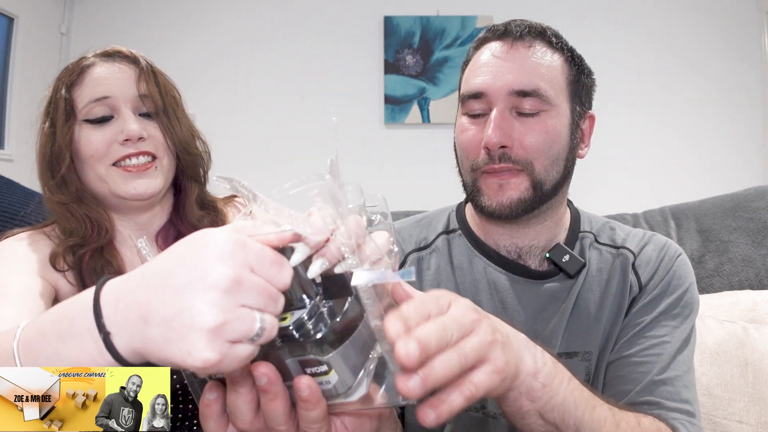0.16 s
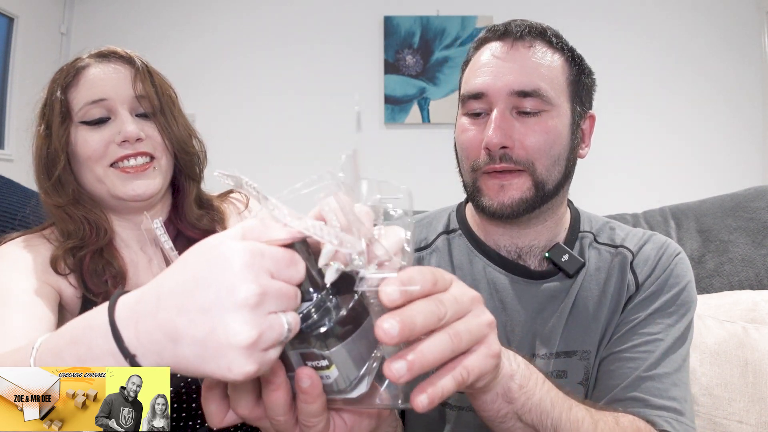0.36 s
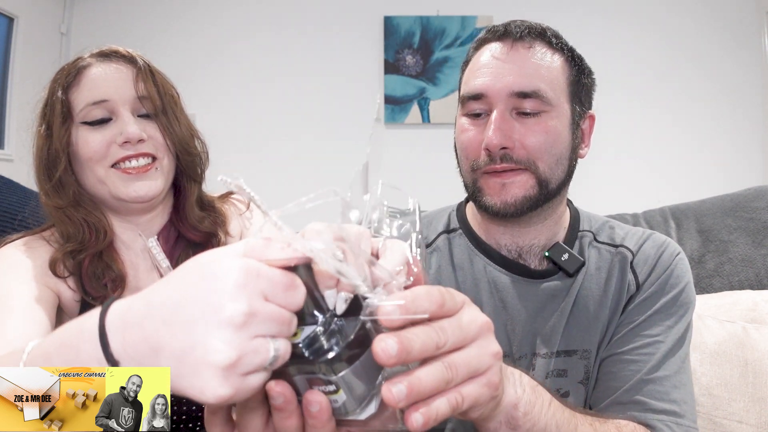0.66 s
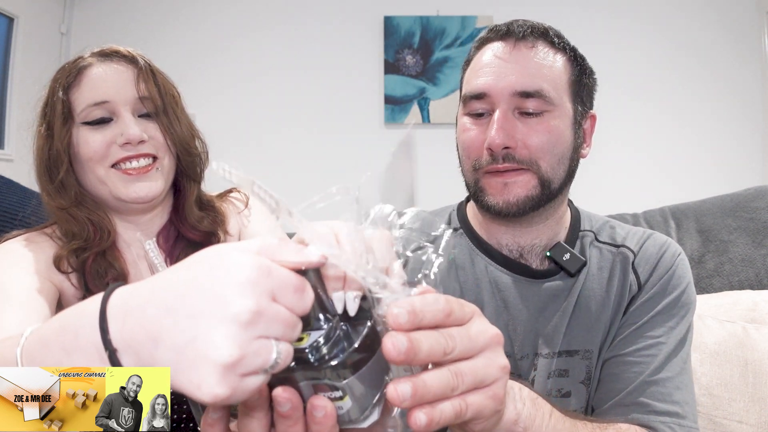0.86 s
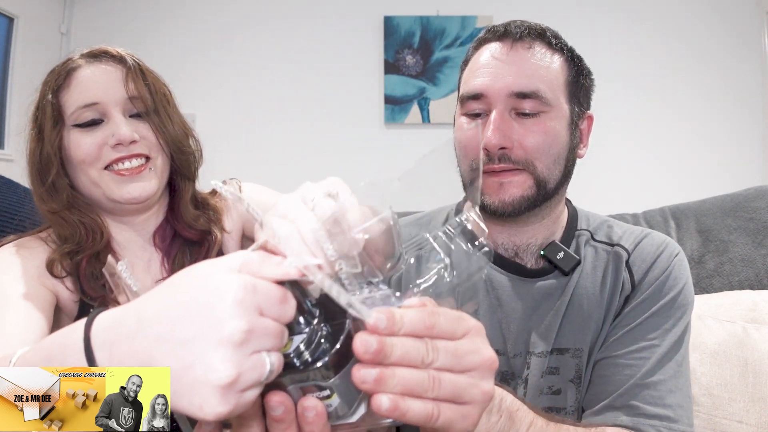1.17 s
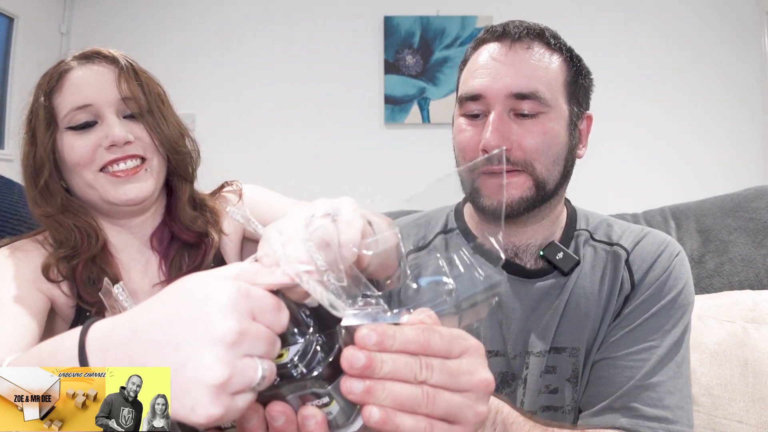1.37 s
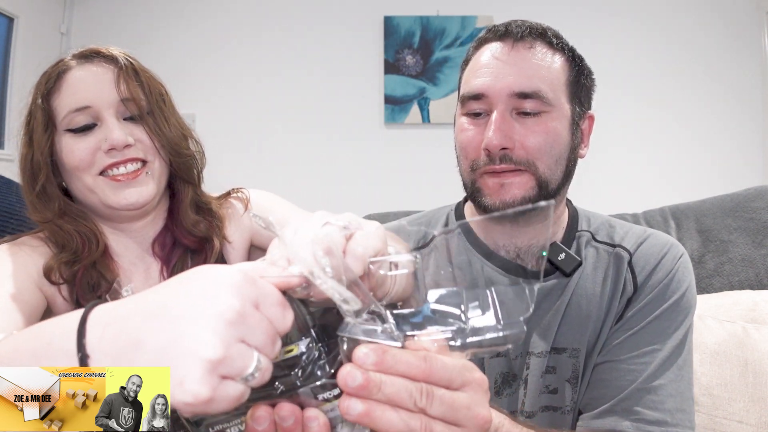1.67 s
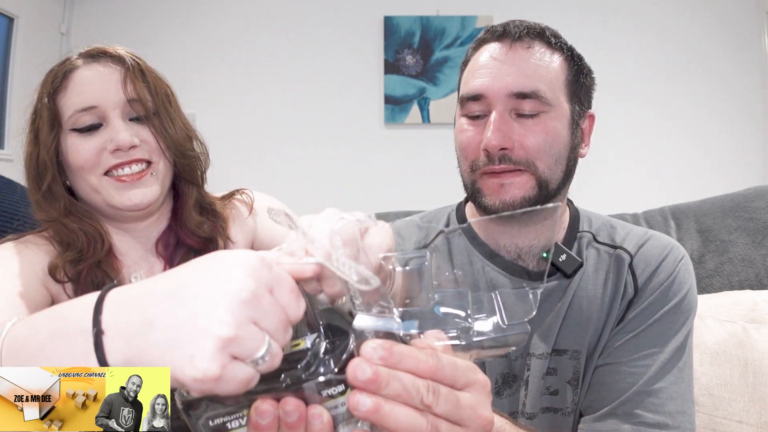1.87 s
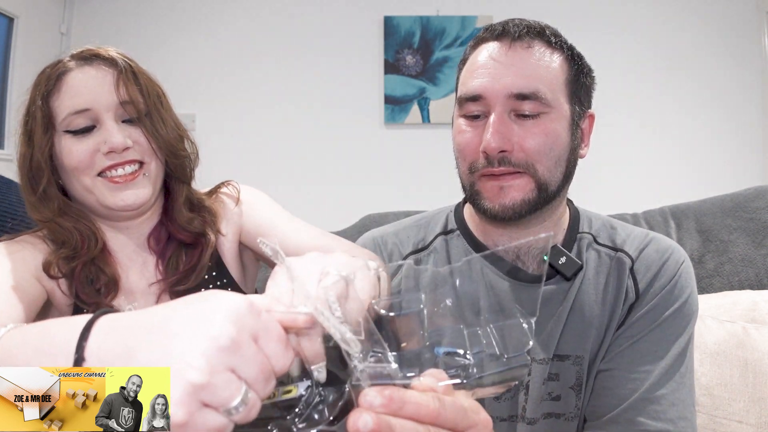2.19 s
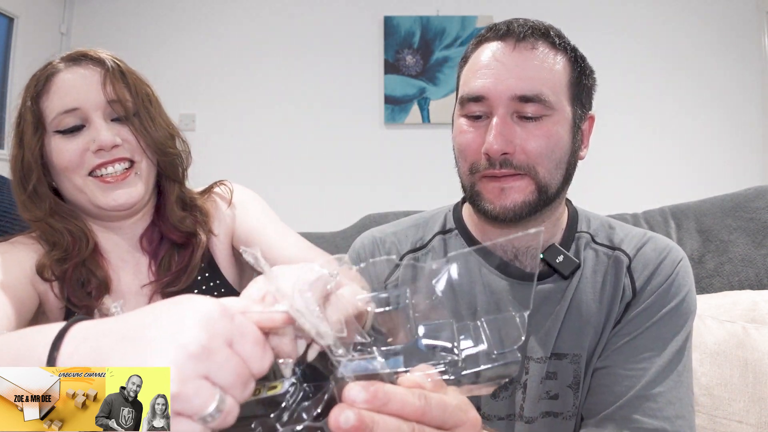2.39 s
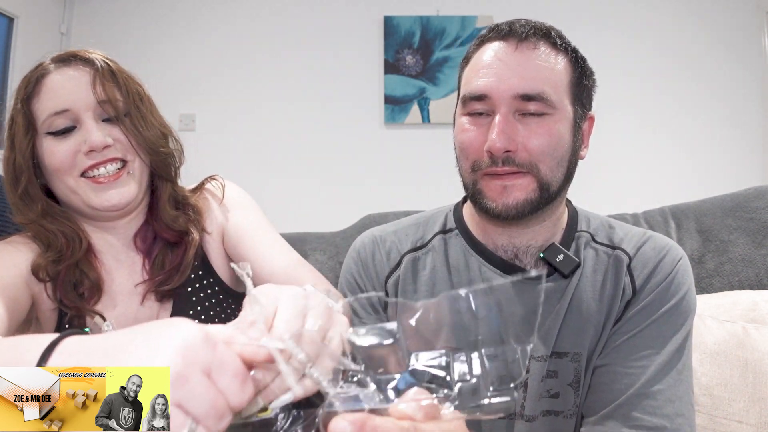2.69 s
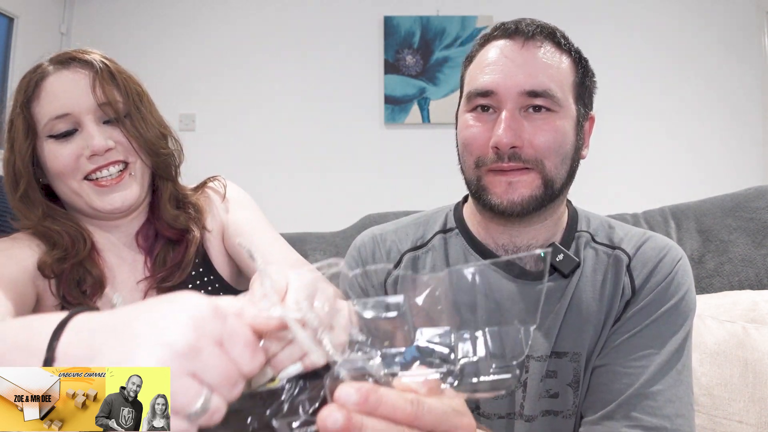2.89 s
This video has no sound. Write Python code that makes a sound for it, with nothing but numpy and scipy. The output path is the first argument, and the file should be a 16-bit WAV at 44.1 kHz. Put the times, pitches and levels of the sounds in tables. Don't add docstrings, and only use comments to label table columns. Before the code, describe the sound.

Plastic blister pack crinkling, popping and crunching close up in a quiet, soft living room

```python
import sys
import numpy as np
from scipy import signal
from scipy.fft import rfft, irfft, next_fast_len
from scipy.io import wavfile
from scipy.ndimage import map_coordinates

SR = 44100
rng = np.random.default_rng(int(sys.argv[2]) if len(sys.argv) > 2 else 0)


def boost(x):
    u = np.asarray(x, float) / 20
    return 10 ** u


def waveform_to_disk(signal):
    frames = np.transpose(np.atleast_2d(signal))
    scaled = np.clip(frames, -1, 1) * 32767
    samples = np.round(scaled).astype(np.int16)
    wavfile.write(sys.argv[1], SR, samples)


N = 134505

# frequency_hz, density_db
HUSH_SPECTRUM = [(18, -64), (30, -50.5), (103, -10.5), (394, -2), (1590, -8), (5590, -27), (16000, -46)]
# start_s, peak_db
TICKS = [(0.0024, -33.5), (0.0444, -31), (0.1315, -27.5), (0.2, -25.5), (0.276, -43.5), (.349, -43.5),
         (0.379, -44), (0.418, -36), (0.489, -36.5), (.522, -44), (.596, -36), (0.835, -29),
         (0.4568, -27.5), (0.5143, -31.5), (0.538, -30.5), (0.7402, -32.5), (0.7662, -31.5),
         (0.822, -42.5), (0.853, -29), (0.8775, -27), (0.9096, -19.5), (1.0906, -29), (1.408, -34),
         (1.447, -33.5), (1.491, -34.5), (1.513, -19.5), (1.5255, -25.5), (1.575, -18.5),
         (1.648, -26), (1.6672, -21.5), (1.7201, -16.5), (1.747, -15.5), (1.7774, -24.5),
              (1.8055, -20), (1.86, -43.5), (1.9111, -34.5), (1.931, -48.5), (2.0101, -21.5), (2.154, -38),
              (2.192, -36), (2.2048, -27), (2.268, -42), (2.2852, -28), (2.3329, -10.5), (2.4097, -25),
              (2.444, -36.5), (2.672, -25), (2.7335, -27), (2.7741, -24), (2.902, -38.5), (2.98, -56),
              (2.996, -44.5), (3.008, -49.5), (3.026, -55.5), (3.045, -47.5)]
# start_s, end_s, slip_rate_hz, peak_db
CREAKS = [
    (1.935, 2.014, 169.6, -37),
    (2.215, 2.328, 172, -39),
    (2.839, 2.96, 81, -51.5),
]
# start_s, peak_db, pitch_hz, brightness_db
SNAPS = [(0.028, -30, 3583, -32.5), (0.048, -29.5, 2564, -22), (0.098, -25.5, 3610, 11.5),
         (0.144, -22.5, 2087, -7), (0.167, -17.5, 2182, 8.5), (0.2, -18.5, 904, -30),
         (0.23, -18.5, 1316, -3), (0.273, -28.5, 837, 9.5), (0.342, -26, 769, 3.5),
         (0.378, -29.5, 791, -9.5), (0.393, -21, 1303, -9.5), (0.406, -13, 2868, -36.5),
         (0.41, -15.5, 888, -11.5), (0.419, -23, 865, -2), (0.512, -11.5, 1861, -7.5),
         (0.546, -21.5, 2206, -29), (0.604, -19, 1228, 4), (0.665, -18, 1263, -6),
         (0.686, -23.5, 1120, -21.5), (0.692, -20.5, 1296, -39.5), (0.713, -22, 580, -32.5),
         (0.721, -7, 1454, -65.5), (0.728, -19.5, 1208, -55.5), (0.734, -19, 1207, -39),
         (0.739, -23, 548, -22.5), (0.813, -21, 815, -22.5), (0.831, -20, 423, -12),
         (0.886, -3.5, 1076, -35.5), (0.892, -10.5, 1015, -22.5), (0.908, -7, 1010, -7),
         (1.09, -37.5, 4354, -25.5), (1.195, -30, 1192, 6.5), (1.241, -26.5, 3020, 9.5),
         (1.259, -19, 2200, -24), (1.295, -20, 1285, -10), (1.356, -32, 1446, -33),
         (1.385, -31, 1280, -24), (1.446, -32, 1847, -22.5),
         (1.489, -12.5, 2172, -17), (1.51, -8, 1407, -46.5), (1.517, -11.5, 1856, -45.5),
                (1.545, -18.5, 321.4, -9), (1.574, -26, 2580, -12), (1.583, -16.5, 1333, -17),
                (1.608, -21, 3140, -20.5), (1.618, -15, 407.7, -19.5), (1.647, -19.5, 1677, -12.5),
                (1.666, -17.5, 1674, -7.5), (1.716, -8, 2041, -32.5), (1.756, -12.5, 403.6, 8.5),
                (1.775, -17.5, 770, -13.5), (1.804, -9, 976.5, -13.5), (1.826, -20, 856, -12.5),
                (1.903, -20.5, 830, -38), (1.931, -28, 791, -23.5), (1.95, -21.5, 1266, -21),
                (2.009, -16.5, 1791, 25.5), (2.131, -23.5, 404.3, -31), (2.199, -22.5, 2820, 11.5),
                (2.219, -27, 2036, -20), (2.267, -21.5, 1270, -5),
         (2.285, -17.5, 876, -15), (2.296, -17, 1465, 6), (2.331, 3, 2058, -16.5),
              (2.34, -19.5, 1850, -21.5), (2.407, -12.5, 1015, -13.5), (2.423, -16, 1033, -13.5),
              (2.449, -9.5, 629.7, -35), (2.499, -17, 1335, 0), (2.535, -10.5, 880.7, -13.5),
              (2.579, -24, 970, -36.5), (2.597, -23, 808.5, -13.5), (2.671, -17, 4522, -21.5),
              (2.693, -4.5, 839.6, -15), (2.771, -12, 778, -24.5), (2.809, -26.5, 808, -10),
              (2.883, -27.5, 880, -19), (2.901, -21.5, 700, -41.5), (2.914, -27, 906, -19.5),
              (3.024, -30.5, 740, -8.5)]
# frequency_hz, density_db
SHEET_SPECTRUM = [(100, -14), (450, -2.5), (850, -5.5), (2900, -8.5), (4200, -16), (6300, -25),
                  (12000, -49.5)]
PACK_MODES_HZ = [373, 700, 798.6, 1010, 1298, 1341, 1564, 2006, 2285, 2922]
# top_s, level_db, t60_s
RUBS = [(0.049, -55, 0.74), (0.91, -36.5, 0.167), (1.259, -38.5, 0.252), (1.5, -35.5, 0.155),
        (1.595, -38.5, 0.64), (1.749, -40.5, 0.184), (2.014, -37, 0.279), (2.212, -57.5, 0.78),
        (2.327, -31.5, 0.343), (2.516, -28.5, 0.249), (2.678, -45.5, 0.361)]
# frequency_hz, density_db
RUB_SPECTRUM = [(1500, -11), (3000, 4), (6000, 7.5), (8000, -2.5), (11500, -2.5), (16000, -15.5)]
# top_s, level_db, t60_s, centre_hz, tilt_db_per_octave above the centre
FOLDS = [
    (.06, -52, 0.5, 2510, -17),
    (.21, -41, 0.825, 477, -1.5),
    (.385, -34.5, 0.136, 824, -2),
    (1.265, -37, 0.266, 384, 4),
    (2.015, -35.5, 0.208, 1563, 2),
    (2.22, -40.5, 1, 785, -0.5),
    (2.32, -24, 0.404, 700, -3),
    (2.53, -32.5, 0.168, 614, -1),
]
CRUNCHES = [(.407, -18, 0.244, 896, 0), (.53, -41.5, 0.118, 1920, 9.5), (.68, -41, 0.163, 1280, 10),
            (.724, -28.5, 0.224, 576, -5.5), (.835, -37, 0.62, 440, -1), (.9, -19.5, 0.2628, 909, -0.5),
            (1.095, -44, 0.161, 3890, -5.5), (1.39, -51, 1, 1360, -2), (1.488, -26, 0.296, 1850, 2.5),
            (1.52, -33, 0.31, 459, -8.5), (1.59, -23, 0.157, 1290, -1), (1.6, -28.5, 0.118, 465, -12.5),
            (1.725, -28, 0.334, 770, -4.5), (1.91, -37, 0.268, 868, -5.5), (2.345, -28, 0.385, 1275, 2),
            (2.7, -38, 0.29, 870, -8)]
# start_s, peak_db, pitch_hz
THUMPS = [
    (0.2, -40.5, 99.5),
    (1.29, -37, 303),
    (2.333, -28.5, 381),
    (0.718, -35, 121),
    (0.886, -27, 106.5),
    (1.498, -36, 215),
    (1.581, -41.5, 112),
    (1.716, -32.5, 309),
    (2.336, -48.5, 90),
    (2.688, -32, 205.4),
]
# start_s, level_db, t60_s, pitch_hz
PANEL_RINGS = [
    (.407, -37, 0.187, 855),
    (.91, -26, 0.2765, 2695),
    (1.586, -27, 0.139, 1335),
    (1.808, -34.5, 0.186, 1006),
    (2.341, -27, 0.27, 2860),
    (2.697, -30.5, 0.381, 899),
    (2.775, -36.5, 0.306, 878),
]
# frequency_hz, t60_s
ROOM_DECAY = [(200, 0.225), (2000, 0.192), (10000, 0.087)]


def unit(x):
    return x / np.sqrt(np.mean(x ** 2) + 1e-20)


def along(points, hz):
    f, v = np.transpose(points)
    return np.interp(np.log(hz + 1), np.log(f + 1), v)


def noise(n, gain_db, shape=1):
    m = next_fast_len(n)
    gain = unit(boost(gain_db(np.fft.rfftfreq(m, 1 / SR))))
    white = rng.standard_normal(n) * shape
    return irfft(rfft(white, m) * gain, m)[:n]


def add(out, s, x):
    i = max(round(s * SR), 0)
    out[i:i + len(x)] += x[:len(out) - i]


def swell(n, rise_s, t60):
    t = np.arange(n) / SR - 2 * rise_s
    return boost(np.where(t < 0, 15 * t / rise_s, -60 * t / t60))


def grainy(n):
    rate_per_s, grain_s, scatter_db = 600, 0.000933, 3.5
    size = boost(scatter_db * np.clip(rng.standard_normal(n), -2, 2))
    slips = (rng.random(n) < rate_per_s / SR) * size
    return unit(0.74 + signal.lfilter([1], [1, -np.exp(-1 / (grain_s * SR))], slips))


def focus(centre_hz, tilt_db):
    lean_db, lean_oct, under_db = 2, 0.079, 15
    mode_db, mode_width_hz = 4, 62
    facets_db, facets_hz = 1.5, 296.6
    knots = rng.standard_normal(200)

    def colour(hz):
        octaves = np.log2((hz + 1) / centre_hz)
        lean = lean_db * np.exp(-.5 * (octaves / lean_oct) ** 2)
        slopes = under_db * np.clip(octaves, -3, 0) + tilt_db * np.clip(octaves, 0, 3)
        modes = sum(mode_db * np.exp(-.5 * ((hz - c) / mode_width_hz) ** 2) for c in PACK_MODES_HZ)
        facets = facets_db * map_coordinates(knots, [hz / facets_hz], mode="nearest")
        return along(SHEET_SPECTRUM, hz) + lean + slopes + modes + facets

    return colour


def hush():
    return boost(-57.5) * noise(N, lambda f: along(HUSH_SPECTRUM, f))


def ticks():
    stray_db, stray_spread_db = -66, 7.5
    tilt_db_per_khz, corner_hz = -1.554, 3780
    out, t = np.zeros(N), np.arange(SR // 100) / SR
    decay = boost(-60 * np.abs(t - .0015) / 0.00613)
    stray = [(s * N / SR, stray_db - stray_spread_db * np.log(e + 0.19)) for s, e in rng.random((150, 2))]
    creak = []
    for start, end, rate, db in CREAKS:
        for s in np.arange(start, end, 1 / rate):
            creak.append((s + rng.normal(0, 0.087 / rate), db + rng.normal(0, 5.34)))
    for s, db in TICKS + stray + creak:
        knots = 4 * rng.standard_normal(12)

        def colour(f):
            low_cut = 20 * np.log10(1 + (corner_hz / (f + 1)) ** 2)
            return np.interp(f, np.arange(12) * 2000, knots) + tilt_db_per_khz * f / 1000 - low_cut

        add(out, s - .001, boost(db - 6.5) * noise(len(t), colour, decay))
    return out


def snaps():
    ring_cycles, rise_s, spread_oct = 1.54, 0.000613, 0.5415
    scatter_db, drop_db = 5, 8
    usual_bright_db, tilt_per_db = -13, 0.3
    late_s, late_cycles = .0008, 0.432
    snap_db, crack_db, crack_s = -4, -5, 0.00806
    rattle_db, rattle_s = -27, 0.222
    out, t, n = np.zeros(N), np.arange(SR // 20) / SR, SR // 4
    other = (np.arange(7) > 0)[:, None]
    crack_decay = boost(-60 * np.abs(t - .001) / crack_s)
    for s, db, hz, bright_db in SNAPS:
        tilt_db = tilt_per_db * (bright_db - usual_bright_db)
        pitch_draw, level_draw = np.clip(rng.standard_normal((2, 7, 1)), -1, 1.5)
        mode_hz = hz * 2 ** (spread_oct * (pitch_draw + 0.7845) * other)
        mode_db = (scatter_db * level_draw - drop_db) * other + tilt_db * np.log2(mode_hz / hz)
        u = t / (rise_s + ring_cycles / mode_hz / 2)
        ring = (boost(mode_db) * np.sin(2 * np.pi * mode_hz * t) * u * np.exp(-u)).sum(0)

        def crack_colour(f):
            octaves = np.log2((f + 1) / hz)
            return along(SHEET_SPECTRUM, f) + 12 * np.minimum(octaves + 1, 0) + tilt_db * np.clip(octaves, 0, 3)

        crack = noise(len(t), crack_colour, crack_decay)
        snap = ring / np.abs(ring).max() + boost(crack_db) * crack
        add(out, s + late_s + late_cycles / hz / 2, boost(db + snap_db) * snap)
        rattle = noise(n, focus(hz, tilt_db), swell(n, 0.00179, rattle_s))
        add(out, s - .004, boost(db + rattle_db) * rattle)
    return out


def rubs():
    out, n, rise_s = np.zeros(N), SR // 2, 0.0092
    for s, db, t60 in RUBS:
        shape = grainy(n) ** 0.595 * swell(n, rise_s, t60)
        add(out, s - 2 * rise_s, boost(db) * noise(n, lambda f: along(RUB_SPECTRUM, f), shape))
    return out


def creases(events, rise_s):
    out, n = np.zeros(N), SR // 2
    for s, db, t60, hz, tilt_db in events:
        shape = grainy(n) * swell(n, rise_s, t60)
        add(out, s - 2 * rise_s, boost(db) * noise(n, focus(hz, tilt_db), shape))
    return out


def thumps():
    out, n = np.zeros(N), SR // 4
    for s, db, hz in THUMPS:
        colour = lambda f: -13 * np.abs(np.log2((f + 1) / hz))
        add(out, s, boost(db) * noise(n, colour, swell(n, 0.00346, 0.038)))
    return out


def panel_rings():
    out, n, width = np.zeros(N), SR // 4, 0.079
    for s, db, t60, hz in PANEL_RINGS:
        colour = lambda f: -20 * np.log10(1 + ((f / hz - 1) / width) ** 2)
        add(out, s - .006, boost(db) * noise(n, colour, swell(n, 0.00185, t60)))
    return out


def room(x):
    hz, t, z = signal.stft(rng.standard_normal(SR // 2), SR, nperseg=256)
    decay = boost(-60 * t / along(ROOM_DECAY, hz)[:, None])
    tail = signal.istft(z * decay, SR, nperseg=256)[1]
    delayed = np.pad(x, (350, 0))
    return boost(-13.5) * signal.fftconvolve(delayed, tail / np.linalg.norm(tail))[:N]


def scene():
    floor = hush()
    pack = ticks() + snaps() + rubs() + creases(FOLDS, .035) + thumps()
    pack = pack + creases(CRUNCHES, .008) + panel_rings()
    return (pack + room(pack) + floor)[None]


def band_limit(x):
    return signal.sosfilt(signal.butter(12, 16800, fs=SR, output="sos"), x)


def record(dry):
    low_hz, high_hz, ceiling_dbfs = 80, 15700, 2
    x = signal.sosfilt(signal.butter(4, low_hz, "high", fs=SR, output="sos"), dry)
    x = signal.sosfiltfilt(signal.butter(12, high_hz, fs=SR, output="sos"), x)
    x = x / (1 + np.abs(x / boost(ceiling_dbfs)) ** 6) ** (1 / 6)
    return band_limit(x)


dry = scene()
out = record(dry)
waveform_to_disk(out)
```